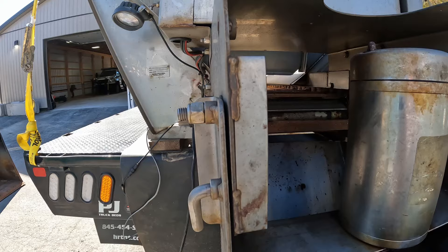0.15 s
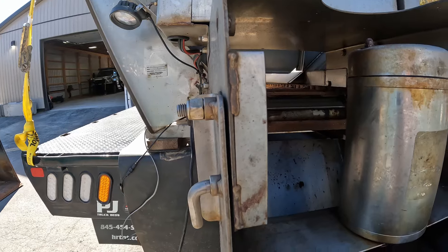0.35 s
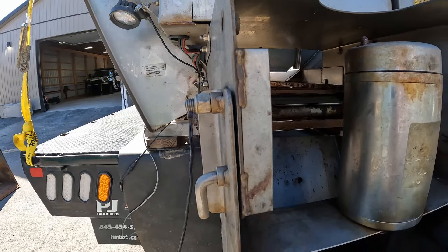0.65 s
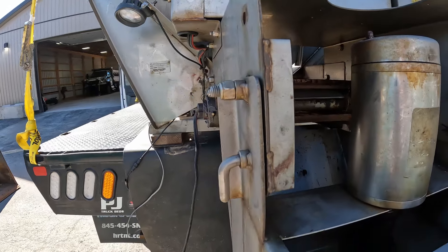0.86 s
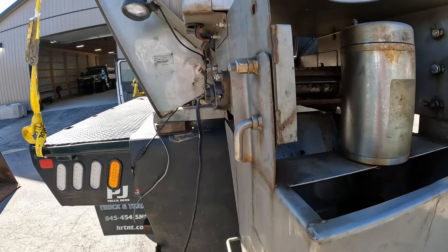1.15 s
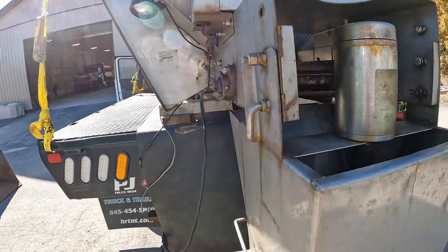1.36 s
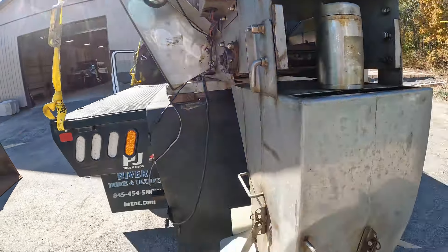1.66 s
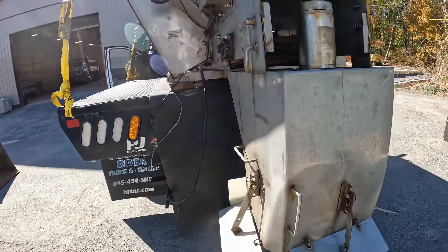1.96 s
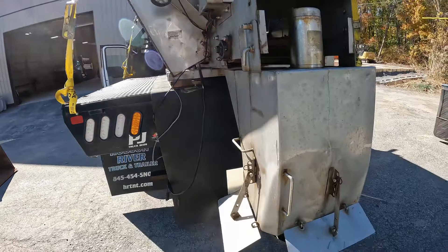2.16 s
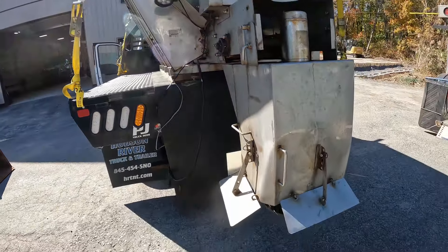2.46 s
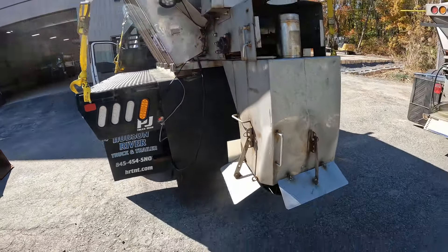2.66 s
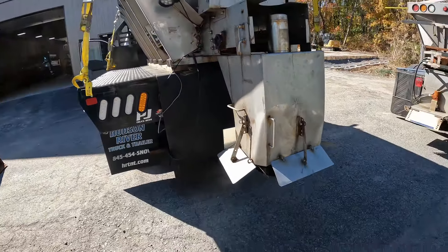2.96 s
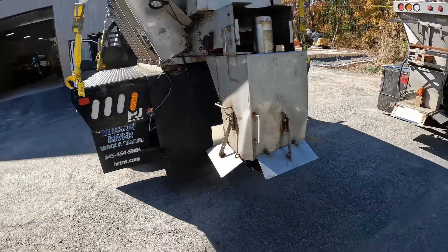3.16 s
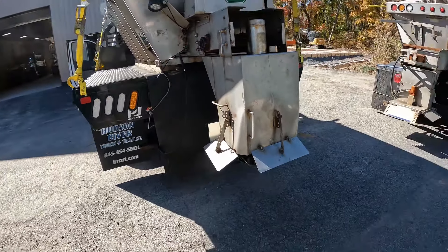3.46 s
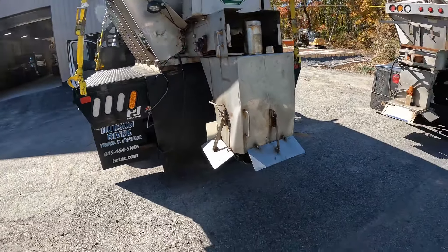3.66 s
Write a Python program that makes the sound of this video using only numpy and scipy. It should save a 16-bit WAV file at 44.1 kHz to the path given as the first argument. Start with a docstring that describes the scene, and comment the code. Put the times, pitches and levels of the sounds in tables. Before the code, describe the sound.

A salt spreader on a truck drones with a wavering low hum and rattling hopper panels; its chain drags, scrapes and clinks, thickest early, then sparser. Open yard, microphone close, then stepping back.

```python
"""A truck-mounted salt spreader runs in an open yard, heard from a step or two behind it.
From the start a wavering motor hum and jolted, resonating panels drone in the steel hopper, over truck and gust noise.
Filtered grains make the chain drag, scrape, clank and clink, thickest with clinks near 0.9 s; panels sing and boom.
From 1.5 s the listener steps back for about a second: the hum shifts its balance and the chain's top treble dulls.
Clinks then come sparser, with a last small group near 2.95 s, while the machine keeps running to the end."""
import sys
import numpy as np
from scipy import signal
from scipy.fft import rfft, irfft
from scipy.io import wavfile
from scipy.ndimage import uniform_filter1d, minimum_filter1d, map_coordinates

SR = 44100
rng = np.random.default_rng(int(sys.argv[2]) if len(sys.argv) > 2 else 0)


def wav_out(sig):
    """Save sig, one row per channel (or a flat mono array), as 16-bit PCM at SR to the path in sys.argv[1]."""
    wavfile.write(sys.argv[1], SR, np.round(np.clip(np.atleast_2d(sig).T, -1, 1) * 32767).astype(np.int16))


N = 167580  # 3.8 s

# motor hum lines: [f/Hz, level close by/dB, level after stepping back/dB]
HUM_LINES = [(66.6, -48, -43), (92.54, -39, -45.5), (141.5, -36.5, -44), (201.8, -29, -29.5),
             (247.2, -35.5, -36.5)]
# hopper panel resonances: [f/Hz, base width/Hz, relative level/dB]
PANEL_MODES = [(184.2, 30, -32), (200.2, 24.4, -31.5), (222.3, 6.95, -34), (245.7, 13, -29.5),
               (275.9, 15, -34), (401.5, 13, -47), (438.6, 23.3, -38), (462.2, 10.5, -40),
               (488.6, 30.6, -35), (524.8, 29, -43.5), (570, 18.6, -37.5), (601.5, 12.7, -41.5),
               (621.8, 39, -42), (767, 30, -45.5)]
# ringing modes of the chain links: [f/Hz, base width/Hz, relative gain]
LINK_MODES = [(2030, 70, 0.31), (2590, 79, 0.78), (3180, 70, 0.63), (3650, 68, 0.62), (4380, 70, 0.42),
              (5140, 110, 0.45), (5170, 190, 0.75), (5960, 70, 0.32), (6500, 83, 0.91), (7060, 120, .6),
              (7770, 100, 0.47), (8932, 120, .3)]

# loudness shapes, used only as swings about their mean: [t/s, level/dB]
DRONE_SWELL = [(0.0, -27), (0.03, -22.5), (0.06, -27), (0.23, -22), (0.28, -25), (0.32, -22.5), (0.37, -18),
               (0.39, -28), (0.53, -17.5), (0.55, -24), (0.62, -24), (0.66, -21), (0.77, -28), (0.8, -18.5),
               (0.84, -22), (0.87, -16.5), (0.99, -27), (1.02, -30.5), (1.06, -22.5), (1.23, -20),
               (1.25, -27.5), (1.47, -22.5), (1.5, -27), (1.55, -18.5), (1.6, -24), (1.84, -24),
               (1.85, -29.5), (1.88, -20.5), (1.97, -25), (2.17, -27), (2.21, -19), (2.34, -24),
               (2.45, -20), (2.51, -24), (2.66, -19.5), (2.69, -24), (3.27, -27), (3.29, -20.5),
               (3.35, -25.5), (3.61, -22.5), (3.63, -32), (3.66, -21), (3.69, -29.5), (3.8, -24)]  # hopper's drone
CLATTER_SWELL = [(0.0, -29), (0.06, -30.5), (0.21, -26), (1.02, -28), (1.06, -33), (1.15, -25), (1.18, -27),
                 (1.21, -28), (1.25, -30.5), (1.43, -27.5), (1.89, -31), (2.02, -30), (2.2, -32.5),
                 (2.26, -28.5), (2.48, -29.5), (2.55, -35), (2.58, -28.5), (2.86, -27), (2.91, -30),
                 (3.38, -29.5), (3.39, -36), (3.45, -32.5), (3.51, -33.5), (3.62, -28), (3.7, -34.5),
                 (3.8, -33.5)]  # panels' clatter
DRAG_SWELL = [(0.02, -37), (0.2, -46), (0.26, -33), (0.5, -47.5), (0.51, -31.5), (0.58, -43), (0.63, -26.5),
              (0.68, -42), (0.95, -37.5), (1.05, -40), (1.13, -35), (1.24, -43), (1.33, -47), (1.43, -37.5),
              (1.45, -40.5), (1.62, -37), (1.77, -48), (2.01, -40.5), (2.04, -46.5), (2.43, -43.5),
              (2.48, -73), (2.5, -37), (2.71, -32.5), (2.77, -46.5), (2.93, -37.5), (2.96, -29),
              (3.07, -46.5), (3.33, -46), (3.34, -37), (3.38, -49.5), (3.78, -48)]  # how hard the chain drags on the trough
RUMBLE_SWELL = [(0.02, -33), (0.23, -30), (1.12, -35.5), (1.16, -22), (1.19, -27.5), (2.08, -37),
                (2.34, -22.5), (2.46, -34), (2.92, -31), (2.94, -39), (3.15, -32.5), (3.17, -41.5),
                (3.51, -34), (3.71, -38.5), (3.74, -20.5), (3.78, -30)]  # truck
GUST_SWELL = [(0.02, -36.5), (1.34, -38), (1.43, -26), (1.51, -40), (1.95, -42), (2.03, -24), (2.08, -37.5),
              (2.21, -28.5), (2.7, -37.5), (2.72, -29.5), (3.08, -42), (3.31, -33.5), (3.37, -53.5),
              (3.42, -41.5), (3.68, -37), (3.78, -27)]  # gusts at the microphone
# centre level of the thin high ring: [t/s, level/dB]
HIGH_RING_LEVEL = [(0, -76), (.1, -71), (.22, -84), (.55, -88), (.7, -80), (1.08, -79), (1.2, -85),
                   (1.8, -84), (2.001, -89.5), (3.8, -89)]

# heavy knocks of the chain's bars on the hopper: [t/s, relative level/dB, brightness/dB per octave]
KNOCK_EVENTS = [(0.656, -2, -11), (0.797, -11, -7), (.855, -16, -8), (1.134, -15, 14), (1.870, -19, 2),
                (2.194, -20, -2), (2.44, -13.5, -6), (2.822, -12, -2), (3.495, -27, 2)]
# notes of rubbed panels: [t/s, length/s, f/Hz, centre level/dB]
SING_EVENTS = [(0.2, 0.15, 769.5, -32.5), (0.865, 0.33, 785, -39.5), (1.3, 0.49, 434.2, -29),
               (1.876, .25, 437, -28.5), (2.27, 0.25, 473.4, -28.5), (2.66, 0.19, 439.4, -32),
               (3.28, 0.21, 491, -32.5)]
# links scraping along the trough: [t/s, nominal length/s, relative level/dB]
SCRAPE_EVENTS = [(0.234, 0.023, -52), (0.514, 0.087, -47), (0.585, 0.034, -44), (0.751, 0.062, -43),
                 (1.075, 0.092, -47.5), (1.21, 0.013, -42.5), (1.399, 0.028, -43.5), (1.489, 0.071, -45.5),
                 (1.616, 0.15, -52.5), (1.776, 0.094, -49), (1.908, .04, -48), (1.991, 0.016, -45),
                 (2.221, 0.086, -45), (2.411, .02, -48), (2.439, 0.06, -49), (2.496, 0.064, -44.5),
                 (2.6, .04, -50), (2.69, 0.022, -52), (2.9, 0.032, -51), (2.798, 0.018, -43.5),
                 (2.94, .035, -41.5), (3.02, 0.036, -47), (3.15, 0.045, -47), (3.208, 0.059, -48),
                 (3.313, .025, -52), (3.364, .02, -49.5)]
# bars clanking on the trough: [t/s, rise/s, relative level/dB, ring f/Hz]
CLANK_EVENTS = [(.29, 0.0063, -50, 1510), (.394, 0.0046, -43.5, 3050), (.606, 0.0065, -45.5, 2700),
                (1.135, .004, -37.5, 3390), (1.408, 0.018, -38.5, 2780), (1.61, 0.0049, -41.5, 3080),
                (2.135, .005, -40, 3220), (2.506, 0.0072, -40.5, 3000), (2.685, .005, -42.5, 1900),
                (3.334, 0.0069, -48.5, 1640)]
# links clinking on the sprocket: [t/s, relative level/dB, f/Hz around which the link rings most]
CLINK_EVENTS = [(0.008, -44, 7000), (0.027, -48, 6000), (.048, -50, 6600), (.865, -50, 7040),
                (0.89, -44, 4930), (.902, -47.5, 7000), (0.926, -46, 6400), (0.971, -44, 6800),
                (.995, -52, 5900), (1.013, -50.5, 6000), (1.663, -55, 9100), (2.944, -42, 5500),
                (2.958, -45, 6500), (3.039, -54, 4420), (3.326, -52.5, 2600), (3.72, -54.5, 7000)]

# tone colours, only their shape counts: [f/Hz, relative level/dB]
CLATTER_COLOUR = [(40, -21.5), (150, 5.5), (310, 3), (375, 1), (420, 4), (620, -8.5), (680, -4.5),
                  (900, -4), (1300, -14), (2000, -28), (4000, -36.5), (10000, -78)]
DRAG_COLOUR = [(100, -43.5), (500, -18.5), (1000, 5), (1500, 6), (2100, 2), (2900, -1), (4000, -9.5),
               (5200, -15), (6000, -18.5), (7400, -20.5), (9000, -31), (12000, -38.5), (15000, -68)]
SCRAPE_COLOUR = [(150, -41.5), (700, -14), (1500, 4.5), (3100, 2.5), (4200, -1.5), (5200, -5.5),
                 (6000, -11.5), (7400, -10.5), (9000, -23), (10800, -24.5), (12300, -27.5), (15000, -44.5)]
CLANK_COLOUR = [(400, -23.5), (1500, -11.5), (2300, 2.5), (3300, -0.5), (4200, -8), (5400, -10),
                (7500, -21), (12000, -33), (15000, -55)]
CLINK_COLOUR = [(300, -54), (1200, -21.5), (3000, 2), (5000, 0), (5900, -1.5), (6700, -4), (7700, -2.5),
                (9000, -13), (11000, -17.5), (12500, -16.5), (15000, -40)]
RUMBLE_COLOUR = [(30, -27), (65, 9.5), (90, 6), (125, 7.5), (250, -13), (1000, -67), (4000, -120)]
GUST_COLOUR = [(8, -9.5), (25, 4.5), (40, 0), (55, -3), (110, -18.5), (600, -73), (3000, -120)]

# layer trims in dB
LARGE_PANEL_DB, SMALL_PANEL_DB, CLATTER_DB, KNOCK_DB = -0.5, 2.5, -30.5, -2
DRAG_DB, SCRAPE_DB, CLANK_RING_DB = -42.5, -1.5, -6.5
CLINK_DB, CLINK_RING_DB, RUMBLE_DB, GUST_DB = 1.5, -7.5, -35.5, -34.5
# rise and fall of the contacts in seconds
KNOCK_ATTACK_S, KNOCK_DECAY_S, CLANK_DECAY_S = 0.0079, 0.047, 0.022
CLINK_ATTACK_S, CLINK_DECAY_S = 0.004, 0.011
SCRAPE_ATTACK_S, SCRAPE_RELEASE_S = 0.011, 0.03
# chain jolts: median rate, unevenness of spacing (log spread), decay, share of the beat
LINK_PER_S, LINK_JITTER, LINK_DECAY_S, LINK_SHARE = 43, 0.25, 0.0047, 0.15
TROUGH_DECAY_S, TROUGH_SHARE = 0.0081, 0.95  # amplitude decay; share of the power smeared
EVEN_S, EVEN_SHARE = 0.06, 0.8  # averaging window; share of the level swings removed
# pitch spreads of the hum and the singing, as fractions of their frequency
HUM_WANDER, SING_WANDER = 0.01847, 0.01603
STEP_BACK_S, STEP_LENGTH_S = 1.5, 0.96
SHADE_HZ, SHADE_DB = 9300, -4
LIMIT_S, CEILING, TOP_HZ = 0.012, 0.4, 15200


def undb(db):
    """Turn decibels into gain."""
    return 10 ** (np.asarray(db) / 20)


def unit(x):
    """Scale to an rms of 1."""
    return x / np.sqrt(np.mean(x ** 2) + 1e-18)


def seconds():
    """Time of every sample."""
    return np.arange(N) / SR


def follow(curve):
    """Interpolate a level curve over the whole scene."""
    times, levels = np.array(curve).T
    return np.interp(seconds(), times, levels)


def swell(curve, depth):
    """Ride the gain along a level curve about its mean, with its swings scaled by depth."""
    db = follow(curve)
    return undb(depth * (db - db.mean()))


def walk(rate):
    """Smooth random drift with an rms of 1, through rate knots per second."""
    knots = rng.standard_normal(1024)
    return unit(map_coordinates(knots, [seconds() * rate], mode="wrap"))


def colour(x, points):
    """Filter to a tone colour; white input keeps its power."""
    hz, db = np.array(points).T
    f = np.maximum(np.fft.rfftfreq(2 * N, 1 / SR), 1)
    response = unit(undb(np.interp(np.log(f), np.log(hz), db)))
    return irfft(rfft(x, 2 * N) * response)[:N]


def even(x):
    """Even out slow swings of level, as under a constant drive."""
    power = uniform_filter1d(x ** 2, int(EVEN_S * SR)) + 1e-12
    return unit(x / power ** (EVEN_SHARE / 2))


def grains(per_s, scatter_db):
    """Dense tiny contacts of uneven strength, at an rms of 1."""
    hit = rng.random(N) < per_s / SR
    sign = np.sign(rng.standard_normal(N))
    strength = undb(scatter_db * np.clip(rng.standard_normal(N), -2, 2))
    return unit(hit * sign * strength)


def ring(x, hz, width):
    """One steep resonance: two equal two-pole sections in a row, at an rms of 1."""
    b, a = signal.iirpeak(hz, hz / width, fs=SR)
    return unit(signal.lfilter(b, a, signal.lfilter(b, a, x)))


def strike(t, attack, decay):
    """Straight rise, then an exponential fall."""
    return np.minimum(t / attack, 1) * np.exp(-np.maximum(t - attack, 0) / decay)


def stepped_back():
    """How far the listener has stepped back, from 0 to 1."""
    return np.clip((seconds() - STEP_BACK_S) / STEP_LENGTH_S, 0, 1)


def hopper(beat):
    """Jolts of chain and spinner ring the panels: large ones drone with the motor, small ones clatter."""
    jolts = beat * grains(per_s=1500, scatter_db=0.5)
    large = panels(jolts, [mode for mode in PANEL_MODES if mode[0] < 350])
    small = panels(jolts, [mode for mode in PANEL_MODES if mode[0] >= 350])
    drone = motor() + undb(LARGE_PANEL_DB) * large
    rattle = colour(beat * grains(per_s=3500, scatter_db=0), CLATTER_COLOUR)
    clatter = undb(SMALL_PANEL_DB) * small + undb(CLATTER_DB) * rattle
    # evening resets the rms, so each part gets its own level back
    drone = np.std(drone) * even(drone) * swell(DRONE_SWELL, depth=0.86)
    clatter = np.std(clatter) * even(clatter) * swell(CLATTER_SWELL, depth=0.83)
    return drone + clatter


def motor():
    """Wavering, fluttering sine lines whose balance changes with the listener's place."""
    out, away = 0, stepped_back()
    for hz, near_db, far_db in HUM_LINES:
        phase = 2 * np.pi * np.cumsum(hz * (1 + HUM_WANDER * walk(22.007))) / SR
        level_db = near_db + (far_db - near_db) * away + 5 * walk(30)  # 5 dB of flutter
        out = out + undb(level_db) * np.sqrt(2) * np.sin(phase)
    return out


def panels(jolts, modes):
    """Resonances shaken together, each at its own level."""
    return sum(undb(db) * panel(jolts, hz, width) for hz, width, db in modes)


def panel(jolts, hz, width):
    """One resonance of the hopper, already in motion, taking up more or less of the shaking."""
    lead = SR // 4
    ringing = ring(np.r_[jolts[-lead:], jolts], hz, 1.47 * width)[lead:]
    return unit(ringing * undb(1.17 * walk(7)))


def link_beat():
    """Uneven jolts of the running chain, each dying away quickly, on a steady base."""
    spacing, strength = rng.standard_normal((400, 2)).T
    starts = np.cumsum(np.exp(LINK_JITTER * spacing)) / LINK_PER_S - 1  # already running at 0 s
    t = seconds()
    latest = np.searchsorted(starts, t) - 1
    jolts = unit(undb(5.7 * strength[latest]) * np.exp(-(t - starts[latest]) / LINK_DECAY_S))
    return unit(1 - LINK_SHARE + LINK_SHARE * jolts)


def knocks():
    """A heavy, soft blow makes all the panels boom for a moment, as slightly detuned sines."""
    out, t = np.zeros(N + SR), np.arange(SR // 4) / SR
    shape = strike(t, KNOCK_ATTACK_S, KNOCK_DECAY_S)
    for s, db, tilt_db in KNOCK_EVENTS:
        detune = 1 + 0.03 * rng.standard_normal(len(PANEL_MODES))
        boom = np.zeros(len(t))
        for (hz, _, level_db), shift in zip(PANEL_MODES, detune):
            tone = np.sin(2 * np.pi * hz * shift * (t - KNOCK_ATTACK_S))
            boom += undb(level_db + tilt_db * np.log2(hz)) * tone
        start = int(s * SR)
        out[start:start + len(t)] += undb(db + KNOCK_DB) * shape * boom / np.abs(boom).max()
    return out[:N]


def singing():
    """Rubbed by the chain, a panel holds one wavering note for a moment."""
    t, out = seconds(), np.zeros(N)
    for s, length, hz, db in SING_EVENTS:
        arch = np.sqrt(np.abs(np.sin(np.pi * np.clip((t - s) / length, 0, 1))))
        phase = 2 * np.pi * np.cumsum(hz * (1 + SING_WANDER * walk(25))) / SR
        out += undb(db + 2 * walk(9.8)) * arch * np.sin(phase)
    return out


def chain(beat):
    """All contacts of the chain; stepping back from the trough's mouth shades the top treble."""
    contacts = steel(chain_drag(beat), 0.13) + steel(scrapes(), 0.54) + clinks() + clanks()
    high_pass = signal.butter(4, SHADE_HZ, "high", fs=SR, output="sos")
    top = signal.sosfiltfilt(high_pass, contacts)
    return contacts + (undb(SHADE_DB * stepped_back()) - 1) * top


def steel(x, amount):
    """Add the ringing of the chain links to a contact sound."""
    ringing = 0
    for hz, width, gain in LINK_MODES:
        b, a = signal.iirpeak(hz, hz / width, fs=SR)
        ringing = ringing + gain * signal.lfilter(b, a, x)
    return x + amount * ringing


def trough(x):
    """Dense reflections between the steel walls smear each contact into a short hiss."""
    fade = np.exp(-2 / (TROUGH_DECAY_S * SR))
    power = signal.lfilter([1 - fade], [1, -fade], x ** 2)
    tail = np.sqrt(power) * rng.standard_normal(N)
    return np.sqrt(1 - TROUGH_SHARE) * x + np.sqrt(TROUGH_SHARE) * tail


def chain_drag(beat):
    """Steel and grit grind along the trough as a run of smeared grains, now harder, now lighter."""
    grit = trough(np.sqrt(beat) * grains(per_s=4500, scatter_db=2.5))
    return undb(DRAG_DB) * swell(DRAG_SWELL, depth=0.45) * colour(grit, DRAG_COLOUR)


def scrapes():
    """A link catches and rasps briefly: smeared grains with a fast random flutter of level."""
    t, push = seconds(), np.zeros(N)
    for s, length, db in SCRAPE_EVENTS:
        rise = np.clip((t - s) / SCRAPE_ATTACK_S, 0, 1)
        release = SCRAPE_RELEASE_S + length / 4
        push += undb(db) * rise * np.exp(-np.maximum(t - s - length / 2, 0) / release)
    rasp = unit(undb(1.5 * walk(110)))
    grit = trough(grains(per_s=2400, scatter_db=2))
    return undb(SCRAPE_DB) * colour(push * rasp * grit, SCRAPE_COLOUR)


def clanks():
    """A bar strikes the trough: a rough crash of steel with a brief ring of its own."""
    t = np.arange(SR // 5) / SR
    crashes, rings = np.zeros(N + SR), np.zeros(N + SR)
    chatter = np.resize(grains(per_s=6500, scatter_db=2), N + SR)
    for s, rise, db, hz in CLANK_EVENTS:
        span = slice(int(s * SR), int(s * SR) + len(t))
        push = undb(db) * strike(t, rise, CLANK_DECAY_S) * chatter[span]
        crashes[span] += push
        rings[span] += np.std(push) * ring(push, hz, width=170)
    return colour(crashes[:N], CLANK_COLOUR) + undb(CLANK_RING_DB) * rings[:N]


def clinks():
    """Bright, chattering metal contacts; each rings a different part of the link's modes."""
    t = np.arange(SR // 6) / SR
    shape = strike(t, CLINK_ATTACK_S, CLINK_DECAY_S)
    contacts, rings = np.zeros(N + SR), np.zeros(N + SR)
    chatter = np.resize(grains(per_s=7600, scatter_db=7), N + SR)
    for s, db, centre in CLINK_EVENTS:
        span = slice(int(s * SR), int(s * SR) + len(t))
        push = undb(db) * shape * chatter[span]
        modes = 0
        for hz, width, gain in LINK_MODES:
            nearness = np.exp(-(np.log2(hz / centre) / 0.3) ** 2)  # 0.3 octaves to 1/e
            modes = modes + gain * nearness * ring(push, hz, 2 * width)
        contacts[span] += push
        rings[span] += np.std(push) * unit(modes)
    return undb(CLINK_DB) * colour(contacts[:N], CLINK_COLOUR) + undb(CLINK_RING_DB) * rings[:N]


def high_ring():
    """A faint, thin steel ring: one sine, trembling in pitch and level, that sinks unevenly."""
    phase = 2 * np.pi * np.cumsum(10001 + 4.5 * walk(30)) / SR  # Hz, with its spread in Hz
    return undb(follow(HIGH_RING_LEVEL) + 2.5 * walk(25)) * np.sqrt(2) * np.sin(phase)


def truck_rumble():
    """Low rumble of the truck: evened, coloured noise that swells and sinks."""
    noise = even(colour(rng.standard_normal(N), RUMBLE_COLOUR))
    return undb(RUMBLE_DB) * swell(RUMBLE_SWELL, depth=0.97) * noise


def gusts():
    """Light gusts at the microphone: very low noise in uneven puffs."""
    noise = even(colour(rng.standard_normal(N), GUST_COLOUR))
    return undb(GUST_DB) * swell(GUST_SWELL, depth=1) * noise


def scene():
    """All parts of the running spreader at one microphone."""
    beat = link_beat()  # shared by the hopper and the dragging chain
    machine = hopper(beat) + knocks() + singing() + chain(beat) + high_ring()
    return (machine + truck_rumble() + gusts())[None, :]


def record(dry):
    """The recorder eases the loudest peaks down and cuts the top."""
    size = int(LIMIT_S * SR)
    gain = np.minimum(1, CEILING / (np.abs(dry) + 1e-9))
    gain = minimum_filter1d(gain, 2 * size)  # hold the reduction around each peak
    gain = uniform_filter1d(uniform_filter1d(gain, size), size)
    low_pass = signal.ellip(8, 0.2, 70, TOP_HZ, fs=SR, output="sos")
    return signal.sosfilt(low_pass, gain * dry)


dry = scene()
out = record(dry)
wav_out(out)
```